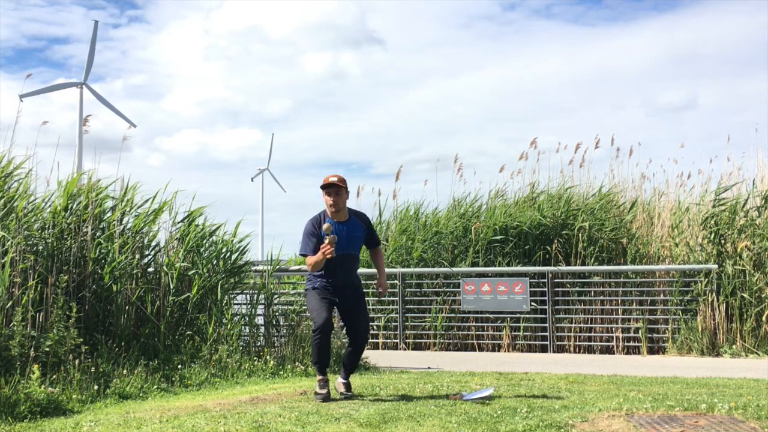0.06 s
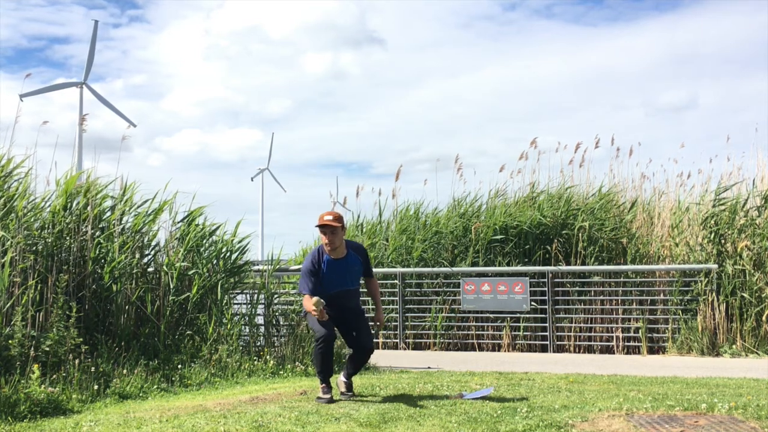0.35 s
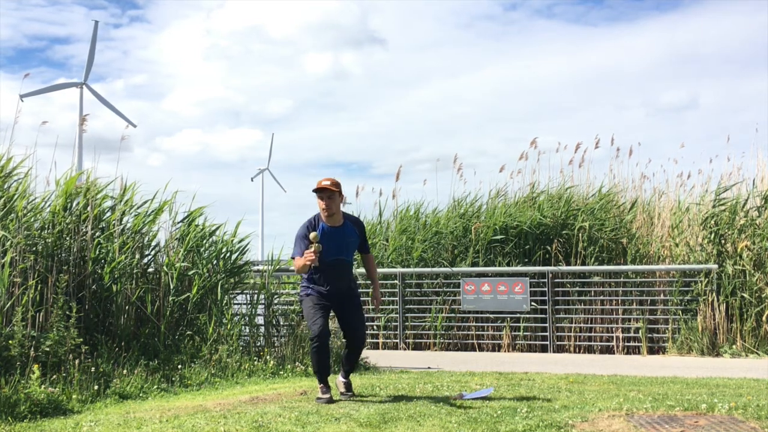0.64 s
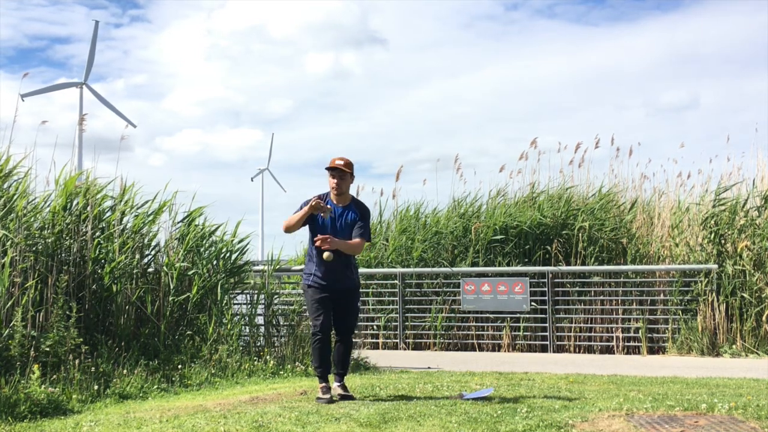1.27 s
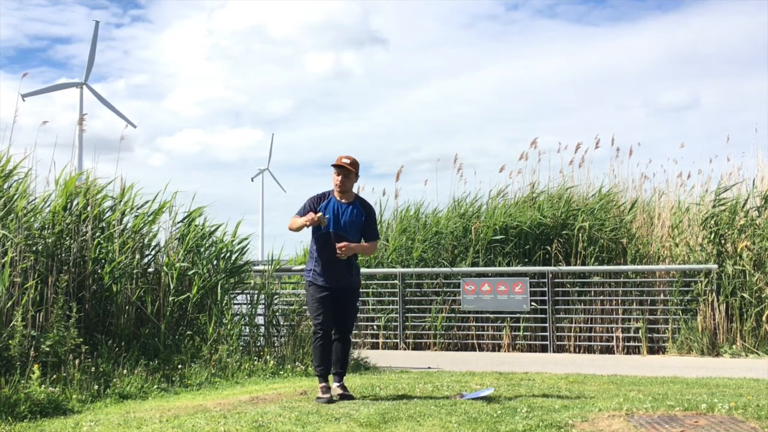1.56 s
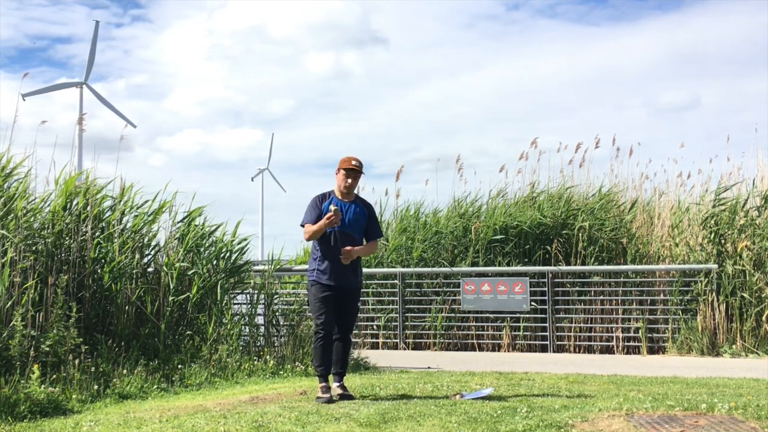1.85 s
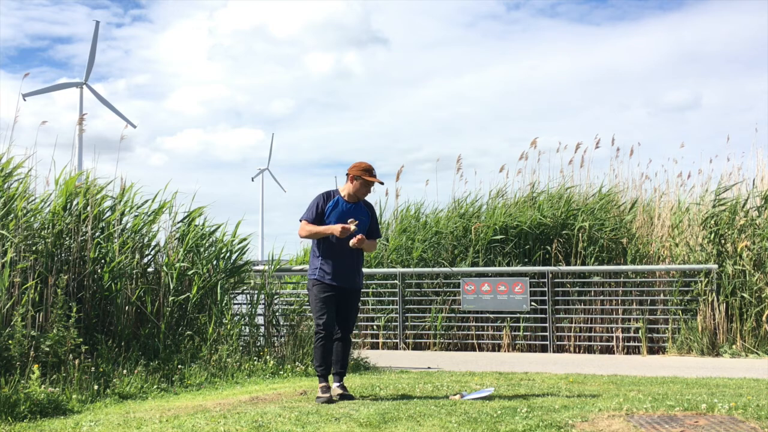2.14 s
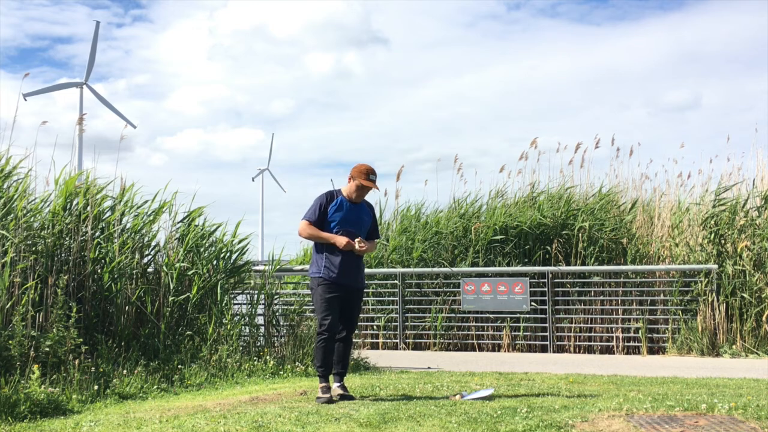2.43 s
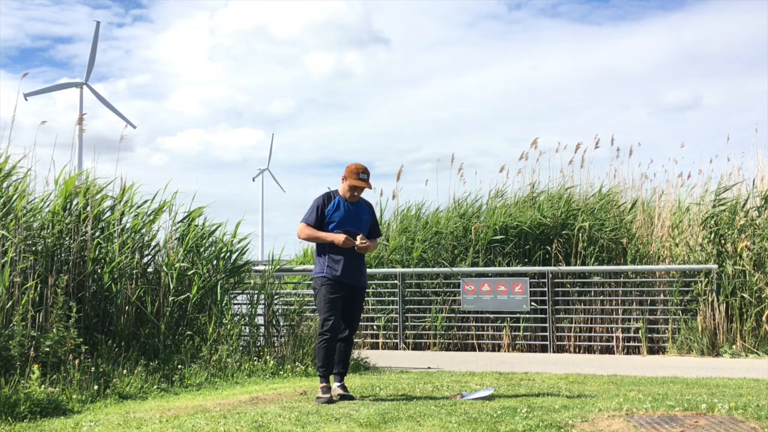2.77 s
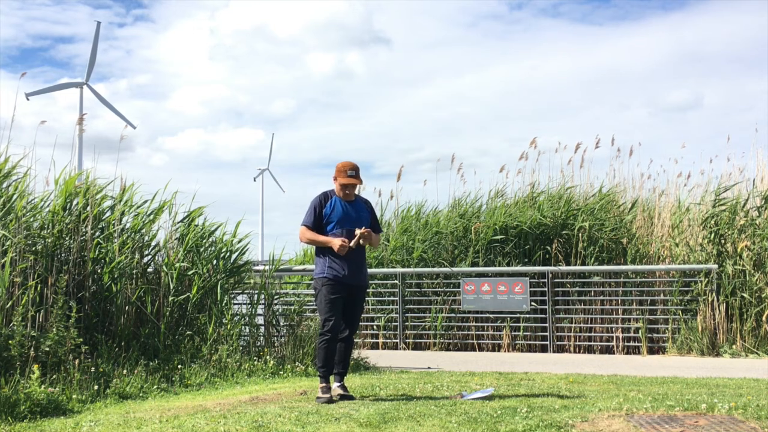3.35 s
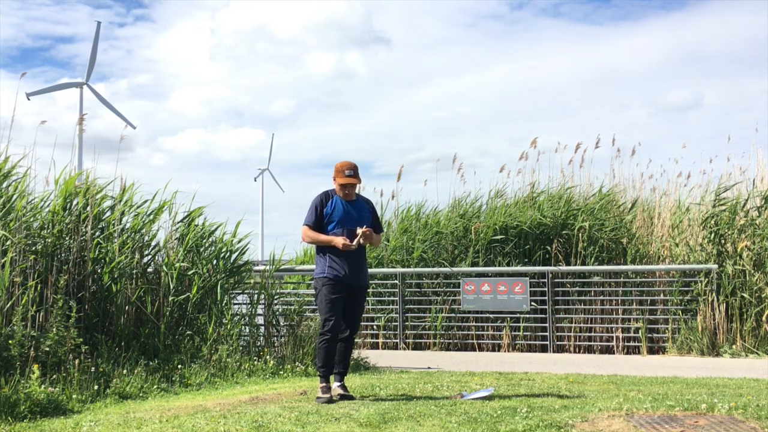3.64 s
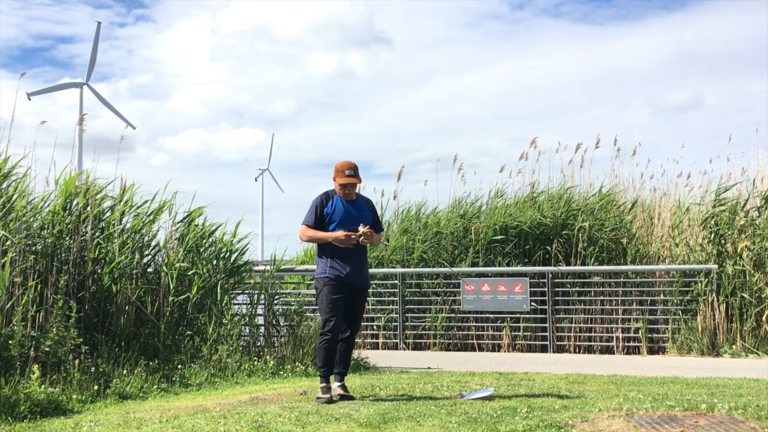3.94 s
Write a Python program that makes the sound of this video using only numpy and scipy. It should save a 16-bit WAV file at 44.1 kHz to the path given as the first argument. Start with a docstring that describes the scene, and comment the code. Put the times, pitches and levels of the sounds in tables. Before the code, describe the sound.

A wooden cup-and-ball toy clacks a few times outdoors, with wind buffeting the microphone.

```python
"""A lawn by a reed bed. A wooden cup-and-ball toy is played a few metres away.
Ball and handle clack and tick: each contact cracks and rings the wood's modes, hard landings add a
knock, and wood and string rub in the hand. Wind buffets the microphone in rumbling gusts.
Small birds chirp in the distance, far traffic hums and the reeds hiss."""
import sys
import numpy as np
from scipy import signal
from scipy.io import wavfile
from scipy.ndimage import uniform_filter1d

SR = 44100
rng = np.random.default_rng(int(sys.argv[2]) if len(sys.argv) > 2 else 0)


def waveform_to_disk(signal):
    """Save audio, clipped to [-1, 1], as 16-bit WAV at the path in sys.argv[1]."""
    frames = np.transpose(np.atleast_2d(signal))
    scaled = np.clip(frames, -1, 1) * 32767
    samples = np.round(scaled).astype(np.int16)
    wavfile.write(sys.argv[1], SR, samples)


N = 176400
TIME = np.arange(N) / SR

# Modes of the toy's body: (frequency [Hz], relative level [dB], t60 [s])
BODY_MODES = [(1084, -3, 0.031), (1116, -7, 0.034), (1210, -16, 0.0077), (1514, -2, 0.011),
              (1844, -7.5, 0.0082), (1824, -3, 0.01), (2780, -11, 0.019), (2880, -18, 0.067),
              (3340, -8.5, 0.0074), (3680, -14, 0.011), (4160, -14.5, 0.0058), (6170, -17, 0.013),
              (5830, -14, 0.013), (7700, -17.5, .0086), (9280, -18.5, 0.016), (11300, -25, 0.014),
              (13400, -11, .009)]
# Wood-on-wood contacts:
# (time [s], gain [dB], low-pass [Hz], spot frequency [Hz], spot gain [dB], spot t60 [s])
CONTACTS = [(0.0653, -41, 8000, 1470, -53, .02), (0.0714, -48, 5000, 3200, -46, .02),
            (0.072, -43, 11000, 1510, -42, 0.051), (0.0805, -55, 6000, 3100, -60, .065),
            (.312, -45.5, 5000, 3790, -51.5, 0.034), (1.1785, -47.5, 6150, 3650, -52.5, .009),
            (1.4592, -43, 7500, 2330, -35.5, .018), (1.4604, -39, 3000, 1100, -33, .03),
            (1.4652, -47, 7100, 2380, -43, 0.017), (1.506, -46.5, 6600, 1370, -41, 0.053),
            (1.666, -47, 2200, 1010, -47.5, .07), (2.215, -52, 7500, 4150, -51.5, 0.016),
            (2.7413, -33.5, 10000, 2850, -40, .022), (2.7436, -40, 2400, 1460, -30.5, .025),
            (2.751, -40.5, 11000, 6050, -46, 0.03), (2.9149, -43.5, 4200, 3080, -45, 0.035),
            (2.931, -45, 4500, 2950, -49, 0.046), (2.959, -46.5, 9000, 1780, -44, .021),
            (2.968, -45, 4030, 2390, -51.5, 0.039)]


def clacks():
    """Each contact cracks and rings the body and the struck spot, with its own brightness."""
    crack_db, crack_t60_s = -7.5, .0045
    grip_detune = .008  # the grip shifts the modes from hit to hit
    out, t = np.zeros(N), TIME[:SR // 5]
    for start_s, db, lowpass_hz, spot_hz, spot_db, spot_t60_s in CONTACTS:
        body = 0
        for k, (hz, mode_db, t60_s) in enumerate(BODY_MODES):
            gain = (-1) ** k * from_db(mode_db + rng.normal())
            body += gain * ring(t, hz * (1 + grip_detune * rng.normal()), t60_s)
        crack = rng.standard_normal(len(t)) * from_db(crack_db - 60 * t / crack_t60_s)
        spot = butter(from_db(spot_db) * ring(t, spot_hz, spot_t60_s), 1.07 * spot_hz, "low")
        add(out, start_s, from_db(db) * butter(body + crack, lowpass_hz, "low") + spot)
    return out


# Hard landings: (time [s], envelope peak [dB], centre [Hz])
LANDINGS = [(1.4601, -27.5, 1690), (2.744, -28, 1410)]


def knocks():
    """A hard landing jolts the ball: one pressure pulse, a cycle or two long."""
    sigma_cycles = .5
    out = np.zeros(N)
    for time_s, db, hz in LANDINGS:
        cycles = (TIME - time_s) * hz
        out += from_db(db) * np.sin(2 * np.pi * cycles) * np.exp(-.5 * (cycles / sigma_cycles) ** 2)
    return out


# Slides in the hand: (start [s], length [s], level [dB], resonance [Hz])
RUBS = [(0.087, 0.023, -62.5, 3200), (0.193, .05, -61, 2330), (1.504, 0.086, -72, 4860),
        (2.198, 0.026, -57, 1600), (2.889, 0.026, -60, 1500), (2.917, 0.044, -66.5, 2930),
        (3.289, 0.032, -63.5, 4270)]


def rubs():
    """Wood and string slide in the hand: dense tiny catches that swell quickly and fade."""
    catches_per_s, edge_ratio, hiss_db = 2500, 1.15, -25
    out = np.zeros(N)
    for start_s, length_s, db, hz in RUBS:
        progress = np.linspace(0, 1, int(length_s * SR))
        catches = (rng.standard_normal(SR) * (rng.random(SR) < catches_per_s / SR))[:len(progress)]
        resonance = unit_rms(butter(catches, [hz / edge_ratio, hz * edge_ratio], "band", order=1))
        hiss = from_db(hiss_db) * unit_rms(butter(catches, 2 * hz, "low"))
        add(out, start_s, from_db(db) * (resonance + hiss) * np.sin(np.pi * np.sqrt(progress)))
    return out


def toy():
    """The small body radiates little bass; reeds and a railing throw its sound back."""
    low_cut_hz, echo_db = 925, -12.5
    direct = butter(clacks() + rubs(), low_cut_hz, "high", order=4) + knocks()
    return direct + from_db(echo_db) * scatter(direct, t60_s=.15)


# Breeze at the microphone: (time [s], level [dB], nominal top edge [Hz])
BREEZE_CURVE = [(0, -40, 362), (.26, -39.5, 387), (.42, -36.5, 216), (.6, -33.5, 305), (1.45, -29, 344),
                (1.57, -38.5, 203), (2.2, -39, 191), (2.5, -43, 197), (2.75, -36.5, 219), (3.2, -44, 175),
                (3.5, -37.5, 178), (4, -40.5, 148.7)]
# Single buffets: (time [s], peak level [dB], nominal top edge [Hz])
WIND_BUFFETS = [(0.019, -26, 309), (0.056, -27, 327), (0.148, -30.5, 302), (0.302, -34, 234),
                (0.343, -31.5, 284), (0.463, -27, 286), (0.544, -23.5, 234), (0.641, -25, 270),
                (0.681, -26.5, 304), (.762, -27.5, 305), (0.827, -23.5, 411), (0.851, -29.5, 557),
                (0.896, -28.5, 397), (0.979, -25.5, 348), (1.122, -30.5, 430), (1.194, -22, 382),
                (1.388, -27, 422), (1.415, -22.5, 431), (1.488, -25.5, 344), (1.644, -28.5, 257),
                (1.767, -25, 297), (1.869, -30.5, 209), (2.028, -29.5, 292), (2.149, -25.5, 256),
                (2.253, -35, 205), (2.426, -38, 200), (2.622, -35, 229), (2.722, -31, 195),
                (2.772, -29, 242), (2.859, -34, 181), (2.928, -33.5, 197), (3.034, -35, 196.6),
                (3.11, -33.5, 178), (3.319, -32.5, 218), (3.372, -32.5, 198), (3.533, -35, 184),
                (3.622, -30.5, 158)]


def wind():
    """Breeze and buffets drive one rumble; small eddies shake its level and its top edge."""
    rise_s, fall_s = .014, .015
    low_cut_hz, tilt_hz = 46.3, 67
    eddy_db, eddy_octaves = 3, .099
    breeze_db, breeze_hz = in_time(BREEZE_CURVE)
    power = from_db(breeze_db) ** 2
    weighted_edge = power * breeze_hz
    for time_s, db, edge_hz in WIND_BUFFETS:
        sigma_s = np.where(TIME < time_s, rise_s, fall_s)
        buffet_power = from_db(db) ** 2 * np.exp(-.5 * ((TIME - time_s) / sigma_s) ** 2)
        power += buffet_power
        weighted_edge += buffet_power * edge_hz
    eddies = drift(rate_hz=42.2)
    top_hz = .97 * weighted_edge / power * 2 ** (eddy_octaves * eddies)
    edge_order = 7.5 * (200 / top_hz) ** .86  # gusts that reach higher have a softer edge
    rumble = 0
    for hz, band in noise_bands([(21, 0), (1200, 0)]):
        slope = 1 / np.sqrt((1 + (low_cut_hz / hz) ** 8) * (1 + (hz / tilt_hz) ** 2))
        rumble += band * slope / np.sqrt(1 + (hz / top_hz) ** (2 * edge_order))
    rumble = unit_rms(rumble)
    local_power = uniform_filter1d(uniform_filter1d(rumble ** 2, size=1100), size=700)
    evened = rumble / np.sqrt(local_power + .28)
    return evened * np.sqrt(power) * from_db(eddy_db * eddies)


def bird_note(length_s, hz, arch, fall, rasp):
    """A wavering sine that arches and falls; arch, fall and rasp are fractions of the pitch."""
    progress = np.linspace(0, 1, int(length_s * SR))
    hump = np.sin(np.pi * progress)
    waver = unit_rms(butter(rng.standard_normal(SR // 4), 570, "low"))[:len(progress)]
    pitch_hz = hz * (1 + arch * (hump - 2 / np.pi) - fall * (progress - .5) + rasp * waver)
    return np.sin(2 * np.pi * np.cumsum(pitch_hz) / SR) * hump


# Chirps: (start [s], length [s], pitch [Hz], level [dB])
BIRD_CHIRPS = [(0.294, 0.042, 4090, -67), (0.332, 0.04, 3560, -63.5), (1.186, 0.052, 3540, -65),
               (1.547, 0.032, 3540, -69), (1.685, 0.054, 4310, -65), (1.733, 0.039, 3650, -64),
               (2.348, 0.036, 4320, -66.5), (2.387, 0.0545, 3560, -62), (3.425, .045, 3560, -67),
               (3.833, 0.043, 3400, -68.5)]
# Two-voiced calls: (start [s], length [s], upper pitch [Hz], level per voice [dB])
BIRD_CALLS = [(2.305, 0.094, 7500, -75), (3.428, 0.072, 7320, -72)]


def birds():
    """Raspy chirps, mostly in pairs, and thin falling calls, blurred by distance."""
    lower_voice_ratio, echo_db = .92, -2.5
    out = np.zeros(N)
    for start_s, length_s, hz, db in BIRD_CHIRPS:
        add(out, start_s, from_db(db) * bird_note(length_s, hz, arch=.027, fall=.1, rasp=.04))
    for start_s, length_s, upper_hz, db in BIRD_CALLS:
        for hz in (upper_hz, upper_hz * lower_voice_ratio):
            add(out, start_s, from_db(db) * bird_note(length_s, hz, arch=0, fall=.054, rasp=.014))
    return out + from_db(echo_db) * scatter(out, t60_s=.9)


# Traffic spectrum: (frequency [Hz], relative density [dB])
TRAFFIC_SPECTRUM = [(100, 9.5), (300, -3), (500, -2.5), (750, 1), (1050, 3), (1500, -4), (2200, -10.5),
                    (3200, -16.5), (5000, -23.5)]
# Traffic loudness: (time [s], level [dB])
TRAFFIC_CURVE = [(0, -58), (0.799, -60.5), (1.5, -60.5), (2.5, -58), (3.2, -59.5), (4, -59)]


def traffic():
    """Far traffic hums; each band wavers a little."""
    return wash(TRAFFIC_SPECTRUM, TRAFFIC_CURVE, waver_db=1.2)


# Reed spectrum: (frequency [Hz], relative density [dB])
REED_SPECTRUM = [(2000, 8.5), (3900, 2), (5000, -2.5), (6500, 4.5), (7800, -7), (9400, -3), (10600, -13),
                 (12500, -1.5), (15500, -12)]
# Reed loudness: (time [s], level [dB])
REED_CURVE = [(0, -72.5), (.31, -67.5), (.345, -71.5), (0.899, -76), (1.499, -74), (1.95, -75.5),
              (2.15, -73.5), (2.55, -71.5), (3.05, -74), (3.4, -73), (4, -74.5)]


def reeds():
    """The reed bed gives a faint, high hiss."""
    return wash(REED_SPECTRUM, REED_CURVE, waver_db=0)


def scatter(x, t60_s):
    """Diffuse, dull echoes from the vegetation."""
    top_hz, onset_s = 5000, .006
    t = TIME[:SR // 2]
    noise = butter(rng.standard_normal(len(t)), top_hz, "low", order=1)
    tail = noise * from_db(-60 * t / t60_s) * (1 - np.exp(-t / onset_s))
    return signal.fftconvolve(x, tail / np.linalg.norm(tail) / 2)[:N]


def wash(spectrum, level_curve, waver_db):
    """Shaped noise that follows a level curve; its bands drift by waver_db rms."""
    level_db, = in_time(level_curve)
    noise = sum(band * from_db(waver_db * drift(rate_hz=8)) for _, band in noise_bands(spectrum))
    return from_db(level_db) * noise


def noise_bands(spectrum):
    """Third-octave bands of a spectrum as (centre [Hz], noise); their sum has unit rms."""
    hz, db = np.transpose(spectrum)
    edges_hz = 20 * 2 ** (np.arange(30) / 3)
    white, bands = rng.standard_normal((2, N + SR)), []
    for k, (low, high) in enumerate(zip(edges_hz, edges_hz[1:])):
        centre = np.sqrt(low * high)
        if hz[0] < high and low < hz[-1]:
            gain = from_db(np.interp(np.log(centre), np.log(hz), db)) * np.sqrt(high - low)
            band = butter(white[k % 2], [low, high], "band", order=3)[SR:]
            bands.append((centre, gain * unit_rms(band)))
    total_rms = np.std(sum(band for _, band in bands))
    return [(centre, band / total_rms) for centre, band in bands]


def ring(t, hz, t60_s):
    """A struck mode: a decaying sine."""
    return np.sin(2 * np.pi * hz * t) * from_db(-60 * t / t60_s)


def drift(rate_hz):
    """Smooth random motion, unit rms."""
    return unit_rms(butter(rng.standard_normal(N + SR), rate_hz, "low")[SR:])


def butter(x, hz, kind, order=2):
    """Causal Butterworth filter."""
    sos = signal.butter(order, np.clip(hz, 10, .45 * SR), kind, fs=SR, output="sos")
    return signal.sosfilt(sos, x + 1e-18)


def in_time(curve):
    """Interpolate each value column at every sample."""
    times_s, *columns = np.transpose(curve)
    return [np.interp(TIME, times_s, column) for column in columns]


def from_db(db):
    """Decibels to gain."""
    return 10 ** (np.asarray(db) / 20)


def unit_rms(x):
    """Scale to unit rms."""
    return x / np.sqrt(np.mean(x ** 2) + 1e-20)


def add(out, start_s, sound):
    """Mix a sound in at its start time."""
    i = max(int(start_s * SR), 0)
    out[i:i + len(sound)] += sound[:max(N - i, 0)]


def scene():
    """All sources at one microphone."""
    background = traffic() + reeds()
    return (background + wind() + toy() + birds())[None]


def record(dry):
    """The microphone drops the deepest bass; the top is cut steeply."""
    low_cut_hz, high_cut_hz = 31.6, 15800
    lowpass = signal.ellip(10, .2, 80, high_cut_hz, fs=SR, output="sos")
    return signal.sosfilt(lowpass, butter(dry, low_cut_hz, "high", order=4))


dry = scene()
out = record(dry)
waveform_to_disk(out)
```